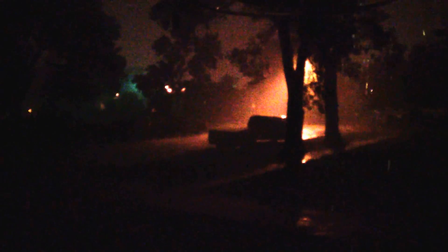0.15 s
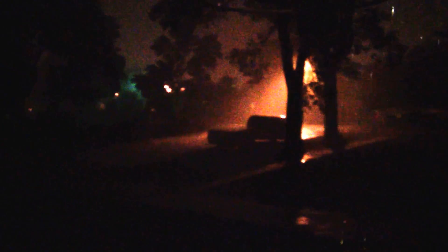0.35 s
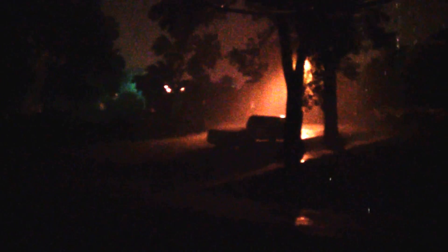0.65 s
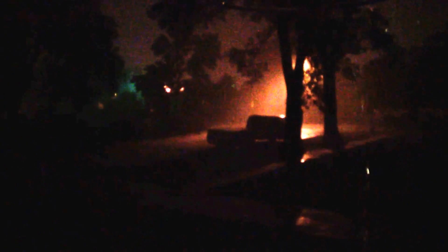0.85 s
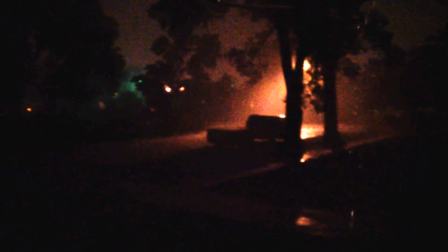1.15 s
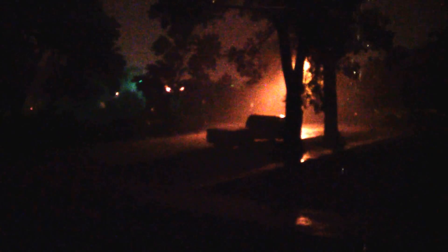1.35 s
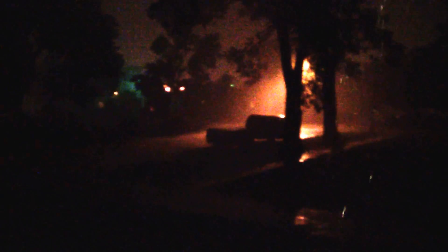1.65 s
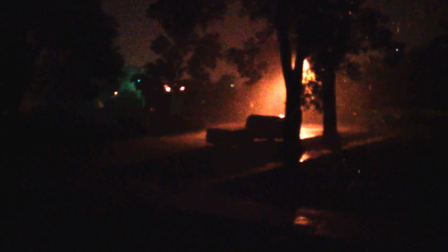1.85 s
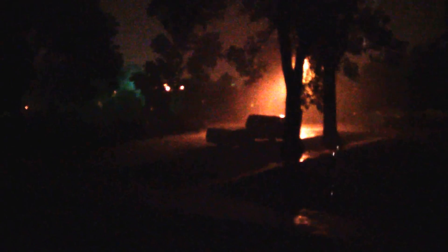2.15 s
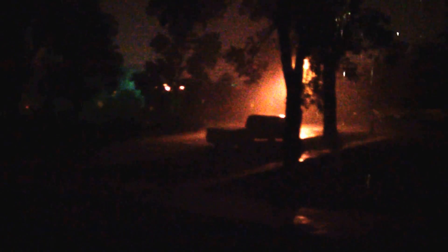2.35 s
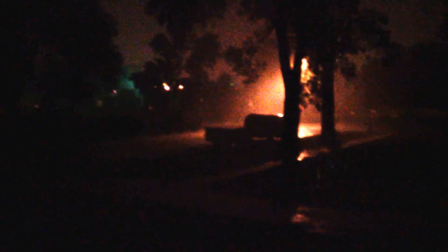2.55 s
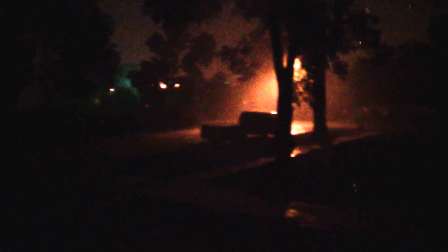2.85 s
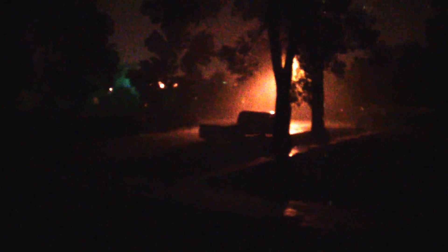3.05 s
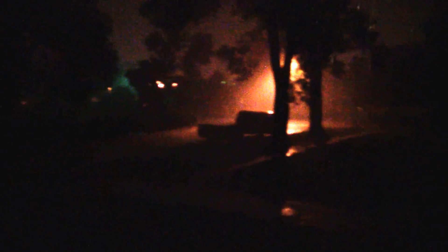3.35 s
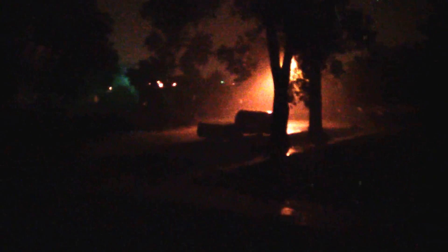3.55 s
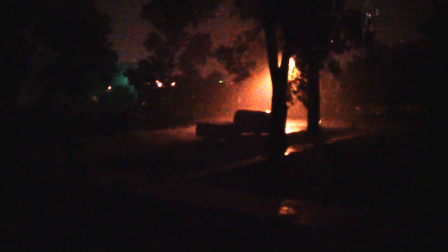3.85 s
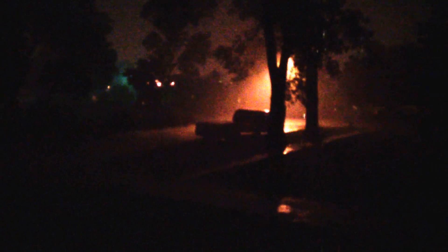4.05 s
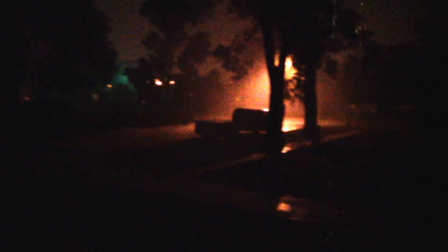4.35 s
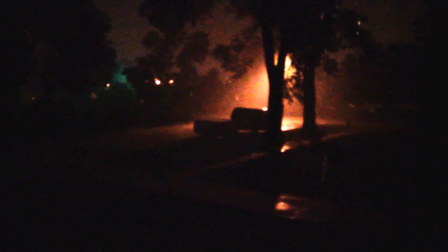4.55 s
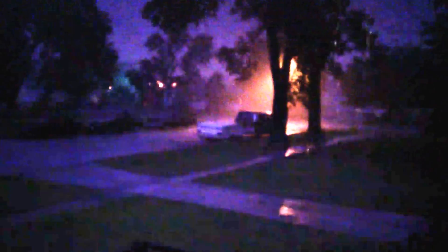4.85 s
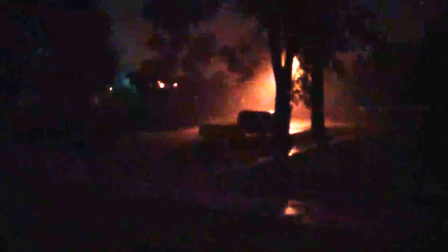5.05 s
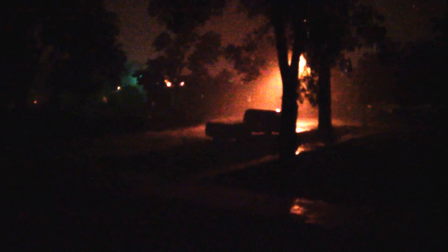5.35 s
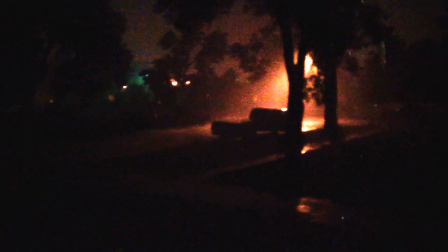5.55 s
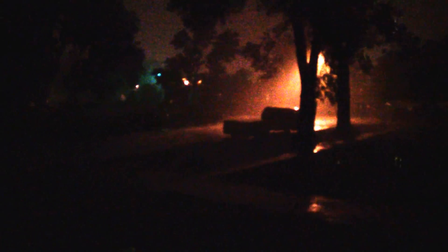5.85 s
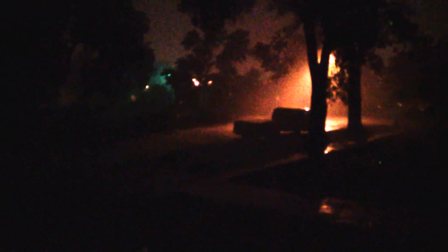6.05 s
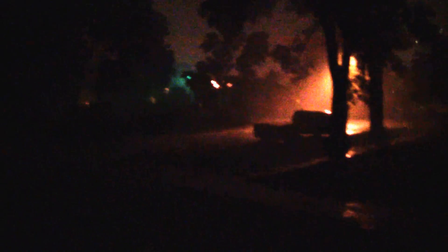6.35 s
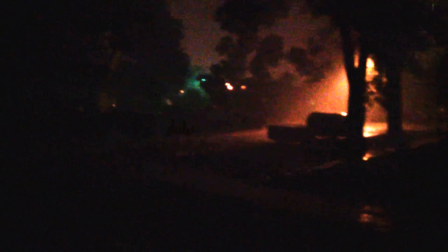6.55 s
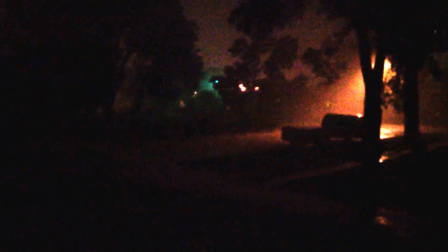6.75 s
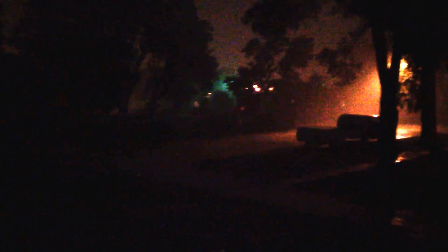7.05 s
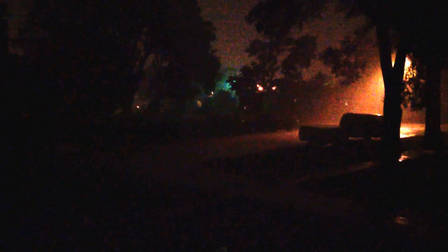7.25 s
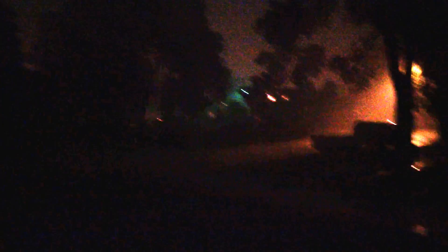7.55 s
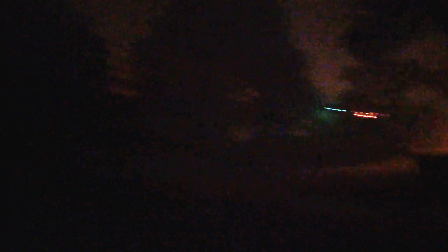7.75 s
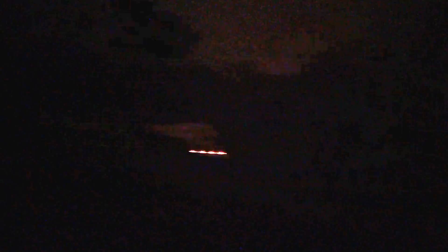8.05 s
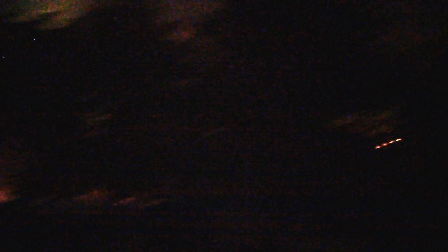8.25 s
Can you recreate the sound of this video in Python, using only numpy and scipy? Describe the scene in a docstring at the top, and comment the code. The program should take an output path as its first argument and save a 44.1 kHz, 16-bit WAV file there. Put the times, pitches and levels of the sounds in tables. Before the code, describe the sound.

Close outdoor pickup of steady dense rain. Irregular large drops smack and plop near the microphone, throwing off fine ticking spray, in front of grainy leaf patter and a broad wash of far rain. Some drops tap a surface with a small pitched ring. Hollow bubbling water sits lower in the mix, beneath it a very faint thunder-like rumble and a few muffled thuds, clearest after six seconds.

```python
"""A street with trees on a stormy night, heard from shelter in heavy rain.
Far rain roars and hisses: random clicks and noise are given a colour and swell unevenly.
Drops patter on leaves and puddles as short pips, and some tap on a surface that rings at one pitch.
Fat drips land close by with ringing plops and snaps, noisy splashes and a falling spray of ticks.
Running water gurgles through hollow resonances; low noise rumbles, with short dull bumps."""
import sys
import numpy as np
from scipy import signal
from scipy.fft import rfft, irfft, next_fast_len
from scipy.io import wavfile

SR = 44100
rng = np.random.default_rng(int(sys.argv[2]) if len(sys.argv) > 2 else 0)


def digitize_waveform(pressure):
    """Quantize a signal to 16-bit integers and store it at the path in sys.argv[1].

    Rows of a 2-D input are taken as channels; values are limited to [-1, 1].
    """
    field = np.atleast_2d(pressure).T
    bounded = np.clip(field, -1, 1)
    quanta = np.round(bounded * 32767).astype(np.int16)
    wavfile.write(sys.argv[1], SR, quanta)


N = 369999  # length in samples
TIME = np.arange(N) / SR
CUTOFF_HZ = 15900  # top of the finished sound, and the highest pitch of any resonance


def from_db(db):
    """Turn decibels into a plain factor."""
    return 10 ** (np.asarray(db) / 20)


def rms_one(x):
    """Scale a sound to an average strength (rms) of 1."""
    return x / np.sqrt(np.mean(x ** 2) + 1e-20)


def level_curve(rows):
    """Join rows of (seconds, dB) by straight lines over the whole scene."""
    seconds, db = np.transpose(rows)
    return np.interp(TIME, seconds, db)


def add(out, start_s, sound):
    """Mix a sound in at its start time."""
    start = int(np.clip(start_s * SR, 0, N - 1))
    out[start:start + len(sound)] += sound[:N - start]


def drift(rate):
    """Wander by chance with rms 1, taking a new random value `rate` times a second."""
    knots = rng.standard_normal(N // 100)
    return rms_one(np.interp(TIME * rate, np.arange(len(knots)), knots))


def coloured(x, colour):
    """Filter a steady sound by rows of (Hz, dB), then scale it to rms 1."""
    hz, db = np.transpose(colour)
    size = next_fast_len(N)
    grid = np.maximum(np.fft.rfftfreq(size, 1 / SR), 1)
    # below the first row almost nothing passes
    gain = from_db(np.interp(np.log(grid), np.log(hz), db, left=-80))
    return rms_one(irfft(rfft(x, size) * gain, size)[:N])


def patchy(x, low_hz, high_hz, patchy_db, rate, count):
    """Let neighbouring pitch ranges swell and sink independently, then scale to rms 1."""
    size = next_fast_len(N)
    spectrum = rfft(x, size)
    grid = np.maximum(np.fft.rfftfreq(size, 1 / SR), 1)
    place = np.interp(np.log(grid), np.log([low_hz, high_hz]), [0, count - 1])
    out = np.zeros(N)
    for k in range(count):
        share = np.maximum(1 - abs(place - k), 0)  # neighbouring ranges overlap
        band = irfft(spectrum * share, size)[:N]
        out += band * from_db(patchy_db * drift(rate))
    return rms_one(out)


def resonance(x, hz, width_hz):
    """Ring at one pitch, longer for a narrower width; the gain at the peak is 1."""
    radius = np.exp(-np.pi * width_hz / SR)
    angle = 2 * np.pi * min(hz, CUTOFF_HZ) / SR
    top = np.array([1, 0, -1]) * (1 - radius ** 2) / 2
    bottom = [1, -2 * radius * np.cos(angle), radius ** 2]
    return signal.lfilter(top, bottom, x + 1e-18)


def impacts(per_s, spread_db, size):
    """Make clicks at random moments, many small and a few large."""
    strength = from_db(spread_db * np.minimum(rng.exponential(1, size), 4))
    happens = rng.random(size) < per_s / SR
    return happens * strength * rng.choice([-1, 1], size)


# How the low rumble rises and falls. Each row: time in seconds, level in dB.
RUMBLE_LEVEL = [(0, -62.5), (1.7, -60), (1.9, -58), (2.2, -55), (3.2, -57), (4.2, -56.5), (5.0, -54.5),
                (6.0, -54), (6.9, -55), (7.5, -51), (8.39, -59)]
# The colour of the rumble. Each row: frequency in Hz, relative strength in dB.
RUMBLE_TONE = [(15, -20), (30, -11), (60, -3), (100, 0), (150, -2.5), (220, -2.5), (400, -24)]
# The short low bumps. Each row: start in seconds, level in dB, length in seconds.
LOW_BUMPS = [(2.10, -52, 0.086), (2.21, -55, 0.065), (3.58, -51, 0.043), (3.879, -51, 0.066),
             (4.85, -53, 0.1), (5.066, -49, 0.049), (5.25, -50, 0.018), (5.50, -50, 0.11),
             (6.61, -41, 0.044), (6.636, -39, 0.025), (6.765, -42.5, 0.063), (7.30, -45.5, 0.07),
             (8.059, -44, 0.075)]


def rumble(lumpy_db):
    """A low uneven rumble with short bumps, each a dull thud inside a puff of noise."""
    level_db = level_curve(RUMBLE_LEVEL) + lumpy_db * drift(14)
    out = from_db(level_db) * coloured(rng.standard_normal(N), RUMBLE_TONE)
    t = np.arange(SR // 4) / SR
    for start_s, bump_db, length_s in LOW_BUMPS:
        envelope = t / length_s * np.exp(-3 * (t / length_s) ** 2)
        thud = np.sin(2 * np.pi * rng.uniform(84, 127.4) * t) * envelope
        noise = rng.standard_normal(len(t)) * envelope
        puff = resonance(resonance(noise, 75, 126), 96, 220)
        bump = rms_one(puff) + 0.44 * rms_one(thud)
        # the level counts the whole energy as if spread over the bump's length
        strength = np.sqrt(np.sum(bump ** 2) / (length_s * SR))
        add(out, start_s, from_db(bump_db) * bump / strength)
    return out


# How the running water rises and falls. Each row: time in seconds, level in dB.
GURGLE_LEVEL = [(0, -41.5), (.7, -42), (1.4, -39.5), (2.2, -41.5), (3.0, -39), (3.9, -44), (4.4, -40.5),
                (5.2, -41), (5.8, -48), (6.35, -36.5), (6.7, -43), (8.39, -43.5)]
# The hollow's resonances. Each row: pitch in Hz, width in Hz, strength in dB relative to the others.
HOLLOW_RESONANCES = [(442, 63, -1.5), (802, 66, 2), (886.5, 70, 2), (1033, 160, -1)]


def gurgle(per_s):
    """Bubbles in running water knock on a hollow, each resonance with strengths of its own."""
    out = np.zeros(N)
    for hz, width_hz, db in HOLLOW_RESONANCES:
        bubbles = impacts(per_s, spread_db=2.5, size=N)
        ringing = resonance(resonance(bubbles, hz, width_hz), hz, 3 * width_hz)
        out += from_db(db) * rms_one(ringing)
    return from_db(level_curve(GURGLE_LEVEL)) * rms_one(out)


# Strength of the far rain. Each row: time in seconds, level in dB before the trim in far_roar.
ROAR_LEVEL = [(0.0, -36.5), (0.3, -38), (3.04, -34), (4.06, -38), (4.28, -38), (4.46, -36), (5.61, -37),
              (6.38, -35), (7.2, -36), (8.39, -36.5)]
# The colour of the roar. Each row: frequency in Hz, relative strength in dB.
ROAR_TONE = [(100, -42), (200, -11.5), (310, -9), (380, -5), (480, -2.5), (560, -0.5), (700, 0.5),
             (820, -3), (1000, -2.5), (1250, -5), (1700, -5.5), (2600, -4), (5000, -15.5)]


def far_roar(trim_db):
    """Countless far drops, clicks mixed with smooth noise, merge into a roar."""
    far = rms_one(impacts(900, spread_db=2.5, size=N)) + rng.standard_normal(N)
    roar = patchy(coloured(far, ROAR_TONE), 300, 1500, patchy_db=2.4, rate=26, count=10)
    return from_db(level_curve(ROAR_LEVEL) + trim_db) * roar


# Strength of the spatter on wet ground. Each row: time in seconds, level in dB before wet_hiss trims it.
HISS_LEVEL = [(0.0, -25.5), (0.42, -29), (0.84, -25.5), (1.12, -28), (2.57, -25), (3.11, -35),
              (3.29, -30.5), (4.7, -29.5), (4.84, -28), (5.09, -27.5), (5.3, -34), (5.51, -25), (5.65, -26),
              (5.96, -28), (6.87, -28.5), (7.08, -28), (8.13, -24), (8.39, -25)]
# The colour of the hiss. Each row: frequency in Hz, relative strength in dB.
HISS_TONE = [(2000, -20.5), (4500, -8), (6600, -4.5), (8100, 1), (9500, 1), (12000, 0.5), (15800, -0.5)]


def wet_hiss(trim_db):
    """Spatter on wet ground: dense ticks of uneven density over smooth noise."""
    ticks_per_s = 4500 * from_db(2.3 * drift(60))
    ticks = rms_one(impacts(ticks_per_s, spread_db=7.0, size=N))
    sizzle = coloured(ticks + from_db(1.0) * rng.standard_normal(N), HISS_TONE)
    hiss = patchy(sizzle, 5100, 13500, patchy_db=1.45, rate=45, count=5)
    return from_db(level_curve(HISS_LEVEL) + trim_db) * hiss


def pips(per_s, spread_db, width_share, scatter_db):
    """Drops farther off: short pips of all pitches, each smeared by its surroundings."""
    t = np.arange(SR // 16) / SR
    out = np.zeros(N)
    fading = np.exp(-t / .004) + from_db(scatter_db) * np.exp(-t / .014)
    envelope = (1 - np.exp(-t / .003)) * fading
    for when, pitch, nearness in rng.random((int(per_s * N / SR), 3)):
        hz = 1100 * 6 ** pitch
        pip = resonance(rng.standard_normal(len(t)) * envelope, hz, hz * width_share)
        add(out, when * N / SR, from_db(spread_db * nearness ** 2) * rms_one(pip))
    return out


# Strength of the patter. Each row: time in seconds, level in dB before the trim in leaf_patter.
PATTER_LEVEL = [(0.0, -33), (0.33, -39), (0.54, -30.5), (1.42, -35.5), (1.82, -31.5), (2.17, -35),
                (5.0, -33.5), (5.33, -37.5), (5.7, -34.5), (6.14, -38), (6.71, -36), (7.74, -32.5),
                (8.06, -35.5), (8.39, -33)]
# The colour of the patter. Each row: frequency in Hz, relative strength in dB.
PATTER_TONE = [(700, -58), (1300, -9), (2000, -2.5), (2550, -7), (2850, 1), (3200, -1), (4200, 3),
               (5500, -1.5), (7500, -4), (14000, 3)]


def leaf_patter(trim_db):
    """Drops on leaves and puddles stay grainy, above a wash of smooth noise."""
    grains = rms_one(pips(per_s=170, spread_db=17, width_share=.07, scatter_db=-11))
    wash = from_db(-6) * rng.standard_normal(N)
    leaves = coloured(grains + wash, PATTER_TONE)
    return from_db(level_curve(PATTER_LEVEL) + trim_db) * leaves


def surface_taps(level_db):
    """Some drops tap on a surface that rings at one pitch."""
    drops = impacts(22, spread_db=2.5, size=N)
    return from_db(level_db) * rms_one(resonance(drops, 2830, 110))


def at_level(hit, db):
    """Scale a hit so that its first 14 ms have this rms level."""
    return hit * from_db(db) / np.sqrt(np.mean(hit[:int(.014 * SR)] ** 2) + 1e-12)


def wet_colour(x, low_hz, sheen_hz, sheen_width_hz, top_db):
    """Bursting water film: no bass and two broad treble peaks, a little different every time."""
    sheen_shift, top_shift, top_chance = rng.standard_normal(3)
    x = signal.lfilter(*signal.butter(2, low_hz, "high", fs=SR), x)
    sheen = resonance(x, sheen_hz * 2 ** (.14 * sheen_shift), sheen_width_hz)
    top = resonance(x, 13300 * 2 ** (.12 * top_shift), 3800)
    return 0.63 * x + sheen - top * from_db(top_db + 3.5 * top_chance)


def plop(t, hz, strike_s, width_share):
    """The crater of a drip rings for a few cycles; ground and walls scatter it back."""
    direct = rng.choice([-1, 1], len(t)) * t / strike_s * np.exp(1 - t / strike_s)
    # the scattered sound fades fast at first, then leaves a weak longer tail
    fading = from_db(-4.5) * np.exp(-t / 0.0087) + from_db(-19) * np.exp(-t / .07)
    echoes = rms_one(impacts(5000, spread_db=0.5, size=len(t)))
    scattered = echoes * (1 - np.exp(-t / 0.0028)) * fading
    width_hz = hz * width_share
    return resonance(resonance(direct + scattered, hz, width_hz), hz, width_hz)


def splash(t, crack_s, sheet_db, sheet_s):
    """A slap, then the crown of water opens and tears into droplets; a soft landing opens slowly."""
    slap = rng.standard_normal(len(t)) * t / crack_s * np.exp(1 - t / crack_s)
    opening = (1 - np.exp(-t / (4 * crack_s))) * np.exp(-t / sheet_s)
    droplets = rms_one(impacts(6000, spread_db=2, size=len(t)))
    crown = droplets * from_db(sheet_db) * opening
    return wet_colour(slap + crown, low_hz=2400, sheen_hz=8300, sheen_width_hz=3000, top_db=5.5)


def spray(t, rise_s, fall_s):
    """Thrown droplets come down as a shower of ticks that swells and dies away."""
    droplets = impacts(6000, spread_db=6.0, size=len(t))
    ticks = wet_colour(droplets, low_hz=2080, sheen_hz=7970, sheen_width_hz=3400, top_db=4.5)
    envelope = (1 - np.exp(-t / rise_s)) * np.exp(-t / fall_s)
    return rms_one(ticks) * envelope / envelope.max()


def small_drips(per_s, spread_db, range_octaves):
    """Smaller drips fall from the trees at uneven intervals, each with its own strengths and pitches."""
    mean_db = np.array([-38, -35, -29.5, -35])  # plop, snap, splash, spray, before near_drips trims them
    rows = []
    chances = rng.uniform(-1, 1, (int(per_s * N / SR), 7))
    for k, (when, low, high, *sizes) in enumerate(chances):
        start_s = (k + .5 + when / 2) / per_s
        plop_db, snap_db, splash_db, spray_db = mean_db + spread_db * np.array(sizes)
        plop_hz = 2820 * 2 ** (range_octaves * low)
        snap_hz = 6400 * 2 ** (range_octaves * high)
        rows.append((start_s, plop_db, plop_hz, snap_db, snap_hz, splash_db, spray_db))
    return rows


# The loudest fat drips close by. Each row: start in seconds, plop level in dB, plop pitch in Hz,
# snap level in dB, snap pitch in Hz, splash level in dB, spray level in dB.
# All levels are before the trims in near_drips.
FAT_DRIPS = [(0.091, -23, 3800, -18, 5130, -20, -25), (0.311, -45, 3750, -22, 4600, -23, -34),
             (0.34, -23.5, 2690, -32, 4460, -25, -25.5), (0.444, -25, 2120, -27, 4600, -28, -43),
             (0.573, -26, 3400, -28, 8300, -16.5, -21), (0.625, -33, 3680, -14.5, 8250, -17.5, -23),
             (0.72, -25.5, 2570, -24.5, 4750, -20, -22.5), (0.887, -31, 3900, -33, 8610, -20, -35),
             (0.906, -36, 3000, -38, 4400, -20, -21.5), (0.945, -28, 2640, -25, 6430, -30, -36),
             (1.026, -41, 3470, -23, 8870, -29, -24), (1.251, -29.5, 3120, -40, 9000, -38, -23.5),
             (1.329, -46, 2800, -30, 8740, -21, -34), (1.381, -35, 2640, -22.5, 9100, -28, -31),
             (1.445, -29.5, 2930, -25, 8610, -22, -28), (1.559, -30, 1460, -33, 4400, -37, -29),
             (1.592, -34, 3560, -33, 7440, -23, -39), (1.664, -47, 2220, -31, 8240, -24, -28.5),
             (1.747, -29, 3000, -23, 8000, -17, -26), (1.778, -27.5, 3030, -21.5, 5700, -23.5, -26),
             (1.932, -28.5, 2700, -38, 4730, -33, -29), (1.987, -32, 3000, -24, 4950, -21.5, -28),
             (2.385, -45.5, 1820, -48, 4400, -20, -33), (2.431, -27, 3150, -32, 8610, -21.5, -24.5),
             (2.73, -29.5, 3050, -21.5, 6500, -21, -23.5), (3.051, -34, 3180, -24.5, 7440, -27, -22.5),
             (3.094, -40, 1800, -27, 9100, -24, -23.5), (3.167, -21.5, 2530, -34, 4870, -27, -42),
             (3.325, -37, 2590, -24.5, 4530, -26, -23.5), (3.501, -31.5, 2130, -28, 5240, -23, -23),
             (3.616, -23.5, 3320, -29, 4900, -36, -35), (3.685, -28, 3430, -44, 4400, -33, -41),
             (3.71, -22.5, 2800, -29, 4400, -32, -35), (3.764, -30, 2850, -28, 7650, -21, -28),
             (3.888, -44, 2220, -45, 4400, -20, -22.5), (3.945, -29.5, 3440, -34, 4530, -25, -46),
             (3.989, -30, 3320, -35, 4800, -28, -44), (4.094, -50, 3540, -19.5, 7240, -21, -27),
             (4.216, -33, 3100, -24, 4840, -18.5, -31), (4.254, -34, 3820, -29, 9050, -19.5, -28),
             (4.326, -30, 2870, -27, 8370, -23, -23.5), (4.503, -18, 3160, -26, 5400, -32, -39),
             (4.602, -38, 3680, -19.5, 6250, -22.5, -18), (4.782, -30.5, 2950, -33, 8610, -26, -22.5),
             (4.96, -32, 2860, -26.5, 8870, -21.5, -30), (5.001, -27.5, 3700, -33, 4380, -34, -27),
             (5.037, -45, 1970, -20, 8740, -31, -21), (5.146, -22.5, 2260, -19.5, 5940, -27, -28),
             (5.238, -43, 3150, -26, 8900, -23, -26), (5.404, -39, 3900, -27, 4800, -42, -44),
             (5.514, -48, 2900, -20, 5030, -19, -22), (5.553, -23, 3200, -17.5, 8550, -24.5, -25),
             (5.626, -31, 2470, -25, 8240, -29, -31), (5.732, -22, 2000, -35, 8900, -18, -29),
             (5.758, -48, 1970, -22, 8740, -26, -32), (5.843, -29, 2970, -32, 8740, -30, -35),
             (6.121, -30, 3260, -39, 5560, -33, -35), (6.331, -34, 1470, -20, 8550, -30, -21.5),
             (6.386, -29, 2760, -45, 4400, -27, -25), (6.565, -32, 3050, -30.5, 8610, -24, -40),
             (6.624, -34, 3100, -29, 4460, -33, -24), (6.668, -28.5, 2820, -24, 7660, -33, -31),
             (6.798, -38, 2590, -22.5, 4900, -29, -25), (6.82, -28, 2400, -27, 8740, -29, -23),
             (6.911, -28, 4330, -21.5, 7000, -19, -23.5), (7.003, -31, 1990, -28, 8870, -33, -41),
             (7.057, -45, 1820, -28, 8300, -22, -34), (7.162, -23, 2970, -33, 7440, -40, -45),
             (7.238, -25.5, 2440, -26, 8740, -31, -22.5), (7.681, -39, 2170, -24, 8010, -24, -23),
             (7.73, -27.5, 3000, -39.5, 9000, -32, -27.5), (7.995, -25, 2270, -38, 6920, -42, -26),
             (8.195, -25.5, 2930, -24.5, 4870, -35, -38), (8.23, -26, 2740, -30, 5400, -21, -24),
             (8.278, -32, 2850, -22, 6820, -24, -26), (8.355, -35, 2980, -19.5, 8500, -32, -19)]


def near_drips(plop_trim_db, snap_trim_db, splash_trim_db, spray_trim_db):
    """Each drip gives a low plop and a high snap, splashes and throws spray."""
    out = np.zeros(N)
    t = np.arange(SR // 4) / SR
    drips = list(FAT_DRIPS) + small_drips(per_s=6, spread_db=2.5, range_octaves=.55)
    for start_s, plop_db, plop_hz, snap_db, snap_hz, splash_db, spray_db in drips:
        # a drip that rings loudly has landed hard; the others splash softly
        crack_s = np.interp(max(plop_db, snap_db), [-32, -24], [.0035, .0005])
        body = plop(t, plop_hz, strike_s=0.0013, width_share=0.38)
        snap = plop(t, snap_hz, strike_s=0.00065, width_share=0.28)
        burst = splash(t, crack_s, sheet_db=5, sheet_s=0.013)
        shower = spray(t, rise_s=0.021, fall_s=0.088)
        add(out, start_s, at_level(body, plop_db + plop_trim_db))
        add(out, start_s, at_level(snap, snap_db + snap_trim_db))
        add(out, start_s, at_level(burst, splash_db + splash_trim_db))
        add(out, start_s, from_db(spray_db + spray_trim_db) * shower)
    return out


def scene():
    """Mix the rumble, the running water, the rain far and near, and the fat drips."""
    low = rumble(lumpy_db=1.8)
    water = gurgle(per_s=70)
    far_rain = far_roar(trim_db=2.0) + wet_hiss(trim_db=1.0)
    nearer_rain = leaf_patter(trim_db=-1.4) + surface_taps(level_db=-45.5)
    drips = near_drips(plop_trim_db=0.47, snap_trim_db=-1.26, splash_trim_db=-0.9, spray_trim_db=-4.0)
    return (low + water + far_rain + nearer_rain + drips)[None]


def record(dry):
    """Round the highest peaks and cut the top of the treble."""
    rounded = 1.3 * np.tanh(dry / 1.3)
    treble_cut = signal.ellip(12, .1, 80, CUTOFF_HZ, fs=SR, output="sos")
    return signal.sosfilt(treble_cut, rounded)


dry = scene()
out = record(dry)
digitize_waveform(out)
```